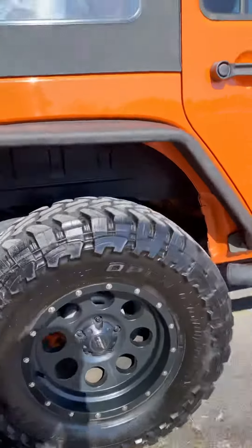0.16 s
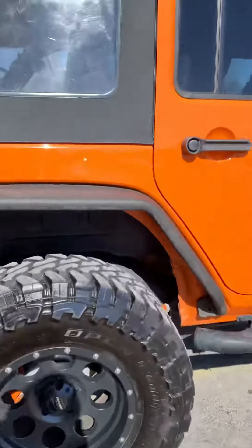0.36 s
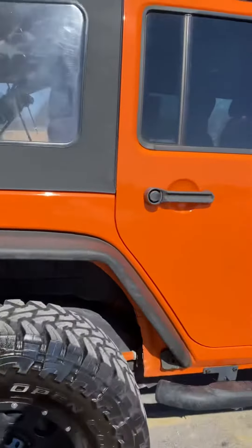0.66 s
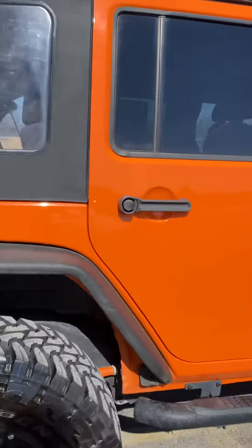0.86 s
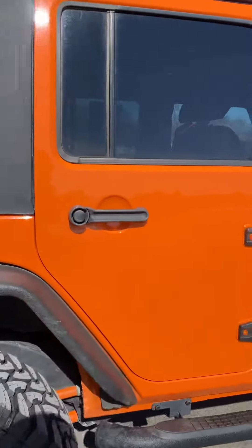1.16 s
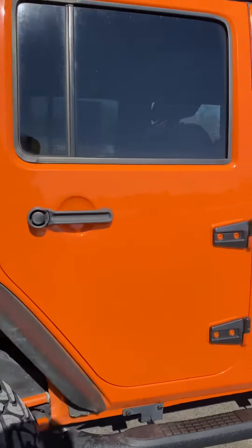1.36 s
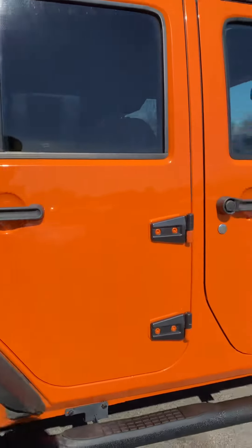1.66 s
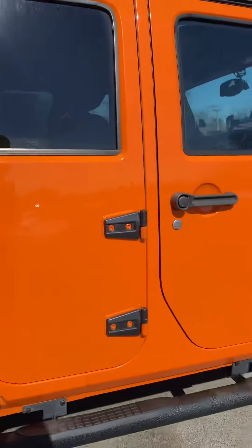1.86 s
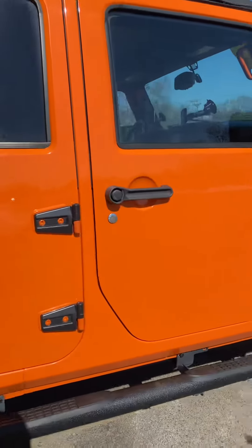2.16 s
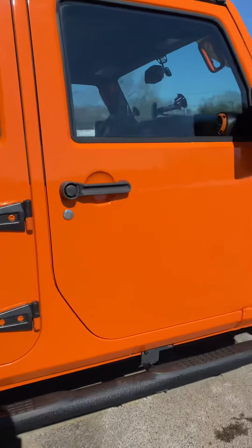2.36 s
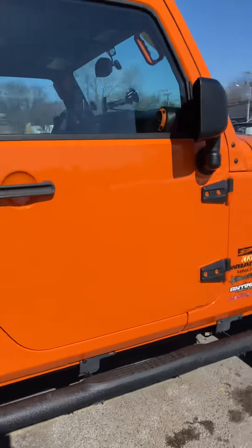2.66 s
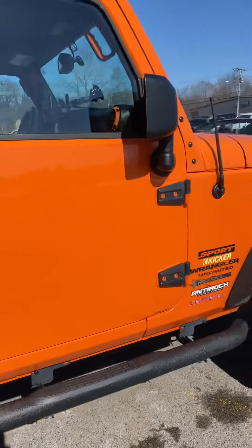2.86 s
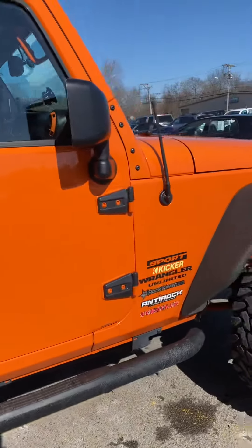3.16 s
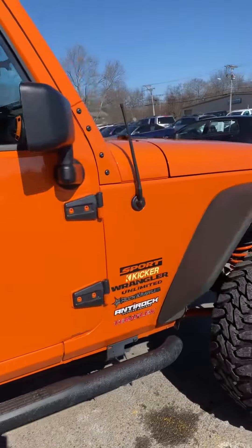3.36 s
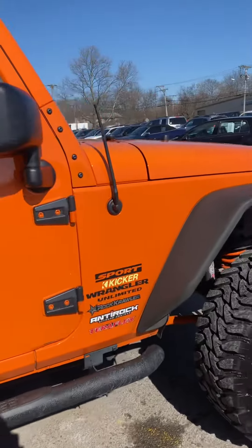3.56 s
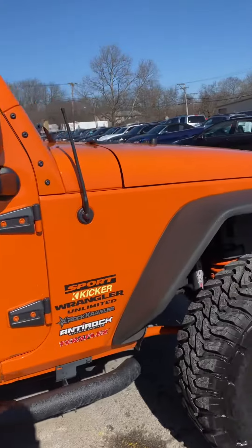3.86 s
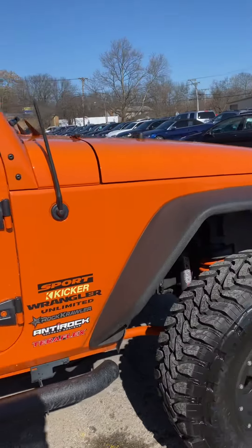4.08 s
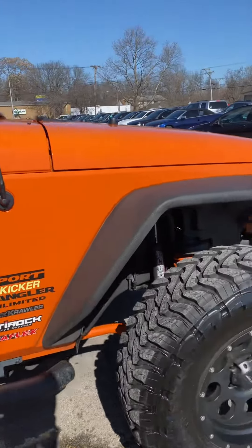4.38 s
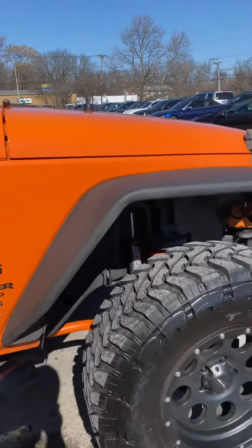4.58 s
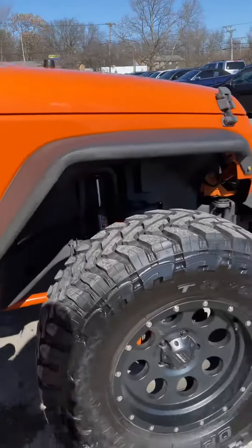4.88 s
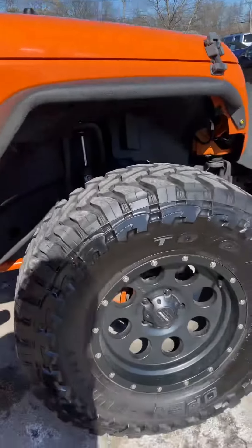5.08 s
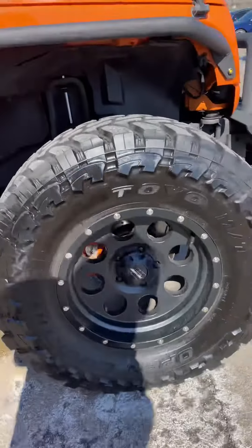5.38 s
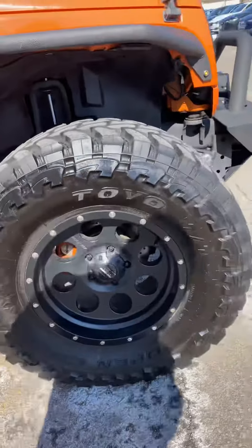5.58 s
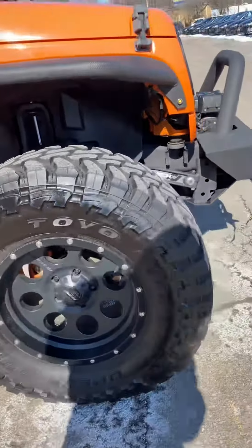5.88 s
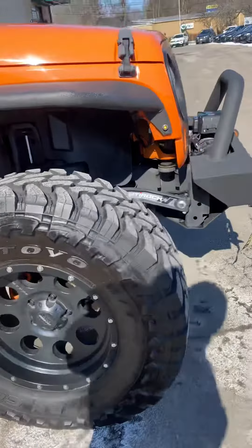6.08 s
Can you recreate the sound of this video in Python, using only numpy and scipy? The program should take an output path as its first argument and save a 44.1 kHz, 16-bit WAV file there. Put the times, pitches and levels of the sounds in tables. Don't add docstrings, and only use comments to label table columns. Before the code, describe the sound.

Close walk along an idling six-cylinder truck: deep humming pulses, growing mechanical hiss and faint belt whine, gusty low thumps, a brief gritty shoe scuff.

```python
import sys
import numpy as np
from scipy import signal
from scipy.fft import rfft, irfft, next_fast_len
from scipy.io import wavfile
from scipy.ndimage import uniform_filter1d

SR = 44100
rng = np.random.default_rng(int(sys.argv[2]) if len(sys.argv) > 2 else 0)


def generate_wav(signal):
    frames = np.transpose(np.atleast_2d(signal))
    scaled = np.clip(frames, -1, 1) * 32767
    pcm = np.round(scaled).astype(np.int16)
    wavfile.write(sys.argv[1], SR, pcm)


def voltage_ratio(level):
    return 10 ** (np.asarray(level, float) / 20)


N = 274919
FAST = next_fast_len(N)
HZ = np.maximum(np.fft.rfftfreq(FAST, 1 / SR), 1)

# time_s, nearness_db
BAY_NEARNESS = [(0, -0.5), (.4, -1.55), (1.4, -0.52), (2.3, -0.67), (3, .5), (3.5, 0.24), (3.8, 0.4),
                (4.3, 0.5), (5.2, 0.62), (5.9, 0.07), (6.23, 0.6)]


def rms_one(x):
    return x / np.sqrt(np.mean(x ** 2) + 1e-20)


def in_time(rows):
    s, *columns = np.transpose(rows)
    return [np.interp(np.arange(N) / SR, s, c) for c in columns]


def at_hz(points, axis=1):
    table = np.array(points)
    return np.interp(np.log(HZ), np.log(table[:, 0]), table[:, axis])


def drift(rate):
    r = np.exp(-80 * np.pi * rate / SR)
    slow = signal.lfilter([1], [1, -2 * r, r * r], rng.standard_normal(N // 40 + 2002))[2000:]
    return np.interp(np.arange(N) / 40, np.arange(len(slow)), rms_one(slow))


def resonate(x, hz, width_hz):
    r = np.exp(-np.pi * width_hz / SR)
    poles = [1, -2 * r * np.cos(2 * np.pi * hz / SR), r * r]
    return signal.lfilter([(1 - r * r) / 2, 0, (r * r - 1) / 2], poles, x)


def coloured(x, spectrum):
    return irfft(rfft(x, FAST) * voltage_ratio(at_hz(spectrum)), FAST)[..., :N]


def low_pass(x, hz):
    return signal.sosfilt(signal.butter(4, hz, fs=SR, output="sos"), x)


def swells(rows, fall_db_per_s, calm_db):
    t, power = np.arange(0, N + 64, 64) / SR, voltage_ratio(2 * calm_db)
    for s, length, db in rows:
        outside_s = np.maximum(np.maximum(s - t, t - s - length), 0)
        power = power + voltage_ratio(2 * (db - fall_db_per_s * outside_s))
    return np.interp(np.arange(N) / SR, t, 10 * np.log10(power))


def engine_turns():
    # time_s, bank_rate_hz (half the firing rate)
    idle_speed = [(0, 16.95), (.54, 16.95), (.74, 17.68), (1.03, 17.88), (1.35, 17.38), (2, 16.98),
                  (2.4, 16.96), (2.75, 17.11), (3.45, 16.88), (3.87, 17.15), (4.2, 17.1), (4.6, 16.85),
                  (5, 16.87), (5.3, 17.03), (6.23, 16.94)]
    return np.cumsum(in_time(idle_speed)[0]) / SR + .27


def spots(multiple):
    # multiple, time_s, peak_db, fall_db_per_s (either side)
    loud_spots = [(5, 0, -41, 9), (5, .8, -43.5, 10), (5, 1.4, -41.5, 12), (5, 2.5, -44, 3), (5, 4, -47, 6),
                  (5, 4.8, -44, 16), (7, .25, -36.5, 12), (7, .8, -39, 12), (7, 2.9, -46, 6),
                  (7, 3.6, -44, 9), (7, 4.1, -44, 12), (7, 4.9, -45, 12), (7, 5.5, -46, 10),
                  (7, 6.1, -49, 4), (8, .35, -42, 20), (8, 3.3, -57, 12), (8, 4, -50, 10),
                  (8, 4.5, -48.5, 12), (8, 4.9, -46.5, 14), (8, 5.55, -44, 12), (8, 5.9, -44, 14),
                  (9, .15, -53, 14), (9, .95, -47, 11), (9, 2.8, -52, 4), (9, 4.9, -53, 10),
                  (9, 6.2, -48, 10), (10, .3, -55, 15), (10, 1, -50.5, 12), (10, 2.3, -53.5, 10),
                  (10, 3.8, -54, 12), (10, 4.9, -53, 16), (10, 5.6, -53, 8), (11, .4, -47.5, 8),
                  (11, .9, -47, 11), (11, 2.5, -53, 3), (11, 4, -53, 3), (11, 5.9, -52.5, 8),
                  (12, .3, -44, 16), (12, 1.5, -55, 10), (12, 2.35, -55, 7), (12, 3.6, -51, 12),
                  (12, 4.1, -46.5, 11), (12, 6, -55, 7), (13, .4, -49.5, 22), (13, 6.1, -54.5, 10),
                  (14, .3, -53, 12), (14, 2, -56, 5), (14, 3.8, -55, 7), (14, 4.5, -55, 12),
                  (14, 5.9, -55, 10)]
    t = np.arange(N) / SR
    levels = [db - fall * np.abs(t - s) for k, s, db, fall in loud_spots if round(k) == multiple]
    return np.max(levels + [-64 + 0 * t], axis=0)


def exhaust(turns, rough_db, wobble_db):
    # time_s, multiple_4_db (of the bank rate), multiple_6_db (re multiple 4)
    along_walk = [(0, -34, 3.5), (.3, -33, 1), (.52, -35.5, 0), (.72, -30, -1), (.9, -29, -2),
                  (1.1, -31, -1), (1.3, -32, -4), (1.5, -38, -.5), (1.7, -35.5, -3.5), (1.95, -37, -3),
                  (2.3, -35.5, -3.5), (3.1, -35.5, -3), (3.5, -38, -1), (3.75, -35, -4.5), (4.1, -35, -4.5),
                  (4.3, -39, -4), (4.5, -33.5, -8.5), (4.7, -40, -7), (4.95, -34.5, -6), (5.4, -37, -7),
                  (5.9, -36.5, -3.5), (6.23, -39, -2.5)]
    # multiple, level_db (re the mean of multiples 4 and 6)
    weaker_orders = [(2, -21), (3, -23)]
    # multiple, lead_rad, change_rad_per_s
    muffler_leads = [(2, 0, 0), (3, 0, 0), (4, -1.55, -.03), (5, -.45, 0), (6, 1, -.3), (7, 3.2, -.25),
                     (8, 1.3, .2), (12, 4, -.9)]
    # pitch_hz, width_hz, level_db
    pipe_rings = [(73.5, 44, 0), (103.7, 15, 4), (208, 81, -11.5), (396, 19, -8), (596, 23, -9.5)]
    cylinder_db = [-8, 8, -2, -19, -9, -10]

    t = np.arange(N) / SR
    db4, sixth_db = in_time(along_walk)
    db6 = db4 + sixth_db
    main_db = (db4 + db6) / 2
    levels = [(4, db4), (6, db6)]
    levels += [(k, spots(multiple=k)) for k in [5, *range(7, 15)]]
    levels += [(k, main_db + db) for k, db in weaker_orders]
    leads = {k: lead + change * t for k, lead, change in muffler_leads}
    nearer_turns = .37 + .465 * t / 343 * 17

    out, burn_db = 0, .4 * drift(4.0)
    for k, db in levels:
        lead = leads.get(k, 2 * np.pi * k * nearer_turns) + .1 * drift(.6)
        level = voltage_ratio(db + burn_db + wobble_db * np.sqrt(k) * drift(2.6))
        out = out + np.sqrt(2) * level * np.cos(2 * np.pi * k * turns + lead)

    at = np.flatnonzero(np.diff(np.floor(2 * turns)))
    pulses = np.zeros(N)
    pulses[at] = voltage_ratio(np.resize(cylinder_db, len(at))) * rng.normal(0.6, 1, len(at))
    rings = 0
    for k, (hz, width_hz, db) in enumerate(pipe_rings):
        rings = rings + (-1) ** k * voltage_ratio(db) * rms_one(resonate(pulses, hz, width_hz))
    return out + voltage_ratio(main_db + rough_db) * low_pass(rings, 580)


def thumps():
    # time_s, peak_db, pitch_hz, sign (push +1, pull -1)
    eddies = [(.0, -20, 110, -1), (.018, -28, 110, -1), (.040, -27, 80, -1), (.0935, -26, 90, 1),
              (.4175, -30, 94, -1), (1.094, -30, 96, -1), (1.1555, -28, 73, -1), (1.3005, -27, 67, -1),
              (1.346, -30, 70, -1), (1.387, -29, 75, -1), (1.441, -26, 84, -1), (1.533, -27, 76, -1),
              (1.6218, -23, 86, -1), (1.9465, -29, 66, -1), (2.3008, -33, 93, -1), (3.181, -30, 79, -1),
              (3.712, -28, 80, -1), (3.8225, -30, 73, -1), (3.8813, -30, 87, 1), (4.217, -33, 66, 1),
              (4.484, -28, 76, 1), (4.5395, -27, 63, 1), (4.68, -31, 72, 1), (4.9185, -33, 70, -1),
              (5.0765, -29, 75, 1), (5.138, -31, 81, -1)]
    t = np.arange(N) / SR
    out = np.zeros(N)
    for s, db, hz, sign in eddies:
        near = slice(max(int((s - .05) * SR), 0), int((s + .05) * SR))
        cycles = hz * (t[near] - s)
        out[near] += sign * voltage_ratio(db) * np.exp(-(cycles / .9) ** 2) * np.cos(2 * np.pi * cycles)
    return out


def engine_bay(turns):
    # pitch_hz, level_db_per_hz
    bay_colour = [(35, -1.5), (100, 1.5), (160, 3.5), (250, -0.5), (500, -3.5), (1100, -8), (1350, -7),
                  (1700, -8), (2500, -9), (3300, -8), (4200, -15), (5300, -18), (6500, -18), (9500, -18.5),
                  (11500, -20), (15500, -28)]
    edges_hz = [0, 900, 2200, 4400, 9000, 20000]
    bay_follows = [1, 0.98, 1.2, 0.83, 0.99]
    swell_db = [.2, .5, .9, 1.0, 1.4]

    near_db = in_time(BAY_NEARNESS)[0]
    beat = .8 * np.cos(4 * np.pi * turns)
    beat = beat + .7 * np.cos(2 * np.pi * turns)
    beat = beat + .4 * np.cos(2 * np.pi * turns / 3)
    beat = beat + .4 * np.cos(8 * np.pi * turns)
    spread = rfft(rms_one(coloured(rng.standard_normal((2, N)), bay_colour)), FAST)
    out = 0
    for k, share in enumerate(bay_follows):
        inside = (HZ >= edges_hz[k]) * (HZ < edges_hz[k + 1])
        band = irfft(spread * inside, FAST)[:, :N]
        out = out + band * voltage_ratio(share * near_db + swell_db[k] * beat + .6 * drift(9.0))
    return voltage_ratio(-40.0) * out


def ticks(turns):
    taps_per_s, ring_cycles, low_hz, high_hz = 400, 18.0, 950, 5200
    bunch = 1 + .6 * np.cos(4 * np.pi * turns)
    struck = rng.random(N) < taps_per_s * bunch / SR
    force = voltage_ratio(3.6 * np.minimum(rng.exponential(1, N), 4))
    taps = struck * force * rng.choice([-1, 1], N)
    dealt = rng.integers(0, 16, N)
    parts_hz = np.geomspace(low_hz, high_hz, 16) * rng.uniform(.95, 1.05, 16)
    rings = []
    for k, hz in enumerate(parts_hz):
        ring = resonate(taps * (dealt == k) + 1e-18, hz, 2.6 * hz / ring_cycles)
        rings.append(ring / np.sqrt(hz))
    pair = np.array([sum(rings), sum(rings[::2]) - sum(rings[1::2])])
    return voltage_ratio(-53 + 1.1 * in_time(BAY_NEARNESS)[0]) * rms_one(pair)


def whines():
    # start_s, end_s, pitch_hz, width_hz, level_db
    whining_parts = [(-0.64, 1.35, 376, 8, -50.5), (-.3, .4, 420, 40, -55), (3.2, 4.1, 378, 8, -55),
                     (3.45, 4.3, 580, 18, -51.5), (3.55, 4.1, 660, 40, -56), (4.4, 5.2, 570, 30, -57),
                     (.2, 1, 1185, 14, -61), (2.3, 4.2, 1185, 16, -58), (4, 5.1, 1120, 30, -57),
                     (5.35, 6.4, 1105, 30, -55), (2.2, 4.1, 1360, 90, -55), (4.65, 5, 1270, 30, -55),
                     (5.1, 5.5, 1350, 40, -54), (3.3, 4.9, 1610, 50, -57), (3.5, 4.4, 1830, 60, -57),
                     (4.6, 5.35, 1815, 25, -51), (4.85, 5.45, 1870, 60, -50.5), (5.1, 5.65, 1930, 40, -52),
                     (4.2, 5.4, 2705, 20, -54), (4.9, 5.7, 2550, 150, -54), (4.85, 6.5, 2650, 300, -54.5),
                     (5.5, 6.5, 2400, 40, -54), (2, 4.3, 2030, 250, -55), (2.2, 4.1, 2520, 120, -58),
                     (5.3, 5.5, 2550, 120, -53), (5.4, 6, 390, 50, -54)]
    out, white = np.zeros((2, N)), rng.standard_normal((2, N))
    for start, end, hz, width_hz, db in whining_parts:
        heard = slice(max(int(start * SR), 0), min(int(end * SR), N))
        t = np.arange(N)[heard] / SR
        fade = np.clip(np.minimum(t - start, end - t) / .2, 0, 1)
        steady = .65 * (width_hz < 31)
        wander = np.cumsum(white[:, heard], axis=1) * np.sqrt(width_hz / SR)
        tone = np.sqrt(2 * steady) * np.sin(2 * np.pi * hz * t + wander)
        rough = rms_one(resonate(resonate(white[:, heard], hz, width_hz), hz, width_hz))
        out[:, heard] += voltage_ratio(db) * fade * (tone + np.sqrt(1 - steady) * rough)
    return out


def wind():
    # start_s, length_s, level_db
    head_gusts = [(0, 0.12, -38.5), (.26, 0.19, -42), (.7, .1, -46), (1.08, 0.13, -38.5), (1.28, .33, -37),
                  (1.86, 0.092, -44), (2.25, 0.28, -43), (2.93, 0.072, -45), (3.14, 0.059, -45),
                  (3.58, 0.34, -45), (4.1, 0.13, -46), (4.42, 0.2, -40), (4.6, .4, -44),
                  (5.04, 0.11, -42.5), (5.2, 0.46, -45), (5.9, .15, -51)]
    # start_s, length_s, level_db, flutter_db (re rumble)
    side_gusts = [(0.07, 0.14, -29, -16), (0.417, 0.061, -29.5, -17.5), (0.763, 0.05, -42, -11),
                  (1.088, 0.22, -34.5, -11.5), (1.41, 0.12, -34, -17), (1.942, 0.05, -31, -16),
                  (2.2, 0.13, -33.5, -15.5), (2.86, 0.061, -32, -14.5), (3.08, 0.2, -35.5, -20),
                  (3.486, 0, -31, -29), (4.073, 0.037, -41.5, -21), (4.41, 0.27, -33.5, -15.5),
                  (4.73, 0, -29.5, -21.5), (4.958, 0.35, -32.5, -15), (5.27, 0.19, -31.5, -20.5)]
    # pitch_hz, level_db_per_hz
    common_colour = [(20, -25), (35, -4), (52, 3), (75, 1), (100, -1.5), (150, -17.5), (300, -24.5),
                     (800, -94.5)]
    apart_colour = [(20, -25), (35, -11.5), (55, -3.5), (90, 1.5), (140, -5), (210, -10.5), (260, -30.5),
                    (800, -100)]
    flutter_colour = [(100, -36), (220, 5), (450, -17), (700, -14), (1500, -71)]

    common_db = swells(head_gusts, fall_db_per_s=169, calm_db=-63)
    rumble_rows = [(s, length, db) for s, length, db, _ in side_gusts]
    apart_db = swells(rumble_rows, fall_db_per_s=69, calm_db=-58.5)
    flutter_rows = [(s, length, db + re_db) for s, length, db, re_db in side_gusts]
    flutter_db = swells(flutter_rows, fall_db_per_s=80.5, calm_db=-64)

    common = voltage_ratio(common_db + 4.5 + 1.3 * drift(12.0))
    common = common * rms_one(coloured(rng.standard_normal(N), common_colour))
    lumps_db = 1.9 * drift(22.0)
    apart = voltage_ratio(apart_db - 3.5 + lumps_db) * rms_one(coloured(rng.standard_normal(N), apart_colour))
    gust_db = flutter_db - 3 * np.clip(-47.5 - flutter_db, 0, 9)
    flutter = rms_one(coloured(rng.standard_normal(N), flutter_colour))
    apart += voltage_ratio(gust_db + 1.0 + 2.1 * lumps_db) * flutter
    return np.array([common + apart, common - apart])


def scuffs():
    # start_s, peak_db, centre_hz, t60_s, width_share (of centre)
    grit_bursts = [(.7165, -32, 3000, .06, .8), (.7165, -37, 4300, .04, .3), (.7165, -27, 2000, .05, .2),
                   (.717, -29, 650, .07, .3), (.7215, -32, 2900, .04, .4), (.7245, -33, 2300, .04, .6),
                   (.748, -33, 600, .06, .4), (.748, -38, 2500, .06, 1.2), (.759, -31, 1000, .025, .4),
                   (.7718, -27, 1500, .02, .8), (.7755, -31, 2150, .05, .15), (.768, -32, 750, .05, .3)]
    out, t = np.zeros((2, N)), np.arange(6000) / SR
    for s, db, hz, t60, share in grit_bursts:
        grit = rng.standard_normal((2, len(t))) * voltage_ratio(-60 * t / t60) * np.minimum(t / .002, 1)
        burst = resonate(grit, hz, share * hz)
        i = round(s * SR)
        out[:, i:i + len(t)] += voltage_ratio(db) * burst / np.abs(burst).max()
    return out


def knocks():
    # start_s, peak_db, pitch_hz, t60_s
    hollow_blows = [(5.3297, -22, 450, 0.029), (5.3319, -26, 290, 0.05), (5.33, -35, 620, 0.013),
                    (5.9628, -33.5, 920, 0.033), (5.9685, -23, 286, 0.025), (5.9796, -27.5, 300, 0.036),
                    (5.9829, -31, 274, 0.026), (6.021, -34, 332, .08), (5.9832, -28, 490, 0.04),
                    (6.208, -32, 820, 0.016), (6.210, -24, 453, 0.015)]
    out, t = np.zeros(N + 4000), np.arange(4000) / SR
    for s, db, hz, t60 in hollow_blows:
        i = round(s * SR)
        ring = voltage_ratio(db - 60 * t / t60) * np.minimum(t / .001, 1) * np.sin(2 * np.pi * hz * t)
        out[i:i + len(t)] -= ring
    return out[:N]


def ground(x):
    delay_s, sway_s, echo_db = .0075, .0009, -9.5
    late = np.arange(N) - SR * (delay_s + sway_s * drift(.5))
    echoed = np.array([v + voltage_ratio(echo_db) * np.interp(late, np.arange(N), v) for v in x])
    return echoed / np.sqrt(1 + voltage_ratio(2 * echo_db))


def two_ports(a, b):
    # pitch_hz, left_lead_rad, likeness (0-1)
    port_phase = [(150, 0, .995), (700, .7, .72), (1380, .4, .88), (2000, 1.9, .5), (2600, 2.55, .78),
                  (3300, 3.14, .92), (3750, 3.55, .8), (4150, 1.3, .25), (4900, 3.1, .84), (5550, 1.5, .72),
                  (7600, 2.5, .75), (8700, 3.1, .97), (11500, 3.1, .95), (13200, 3.7, .6),
                  (15300, 6.1, .75)]
    # pitch_hz, left_minus_right_db
    port_tilt = [(500, 0), (750, 1.5), (1200, 4.5), (1700, 2), (2300, -.5), (4000, -1.5), (5500, 0)]
    # time_s, scattered_share (0-1), extra_left_lead_rad
    well_scatter = [(0, 0, .5), (.13, 0, .35), (.38, 0, 0), (.6, 0, -.3), (.82, .05, 0), (1.2, .2, -.2),
                    (1.7, .12, .05), (2.3, .15, -.2), (2.75, .1, 0), (3.2, .3, -.4), (3.9, .12, -.6),
                    (4.6, .4, -.5), (5, .6, -.6), (6.23, .55, -.6)]

    alike, tilt = at_hz(port_phase, axis=2), voltage_ratio(at_hz(port_tilt) / 2)
    left, other = rfft(a, FAST), rfft(b, FAST)
    shared = alike * np.exp(-1j * at_hz(port_phase)) * left
    own = np.sqrt(1 - alike ** 2) * other
    well = (HZ > 2000) * (HZ < 5400)
    spectra = [
        left * tilt,
        (shared * (1 - well) + own) / tilt,
        shared * well,
        -1j * shared * well * (HZ < 4000),
        alike * well * 1j * other,
    ]
    left, right, aimed, turned, scattered = irfft(spectra, FAST)[:, :N]
    share, lead = in_time(well_scatter)
    direct = np.sqrt(1 - share) * (np.cos(lead) * aimed + np.sin(lead) * turned)
    return np.array([left, right + direct + np.sqrt(share * .85) * scattered])


def scene():
    turns = engine_turns()
    centre = low_pass(knocks(), 2500) + thumps() + exhaust(turns, rough_db=-20.0, wobble_db=.15)
    bay, near, air = engine_bay(turns), whines() + low_pass(scuffs(), 7600), wind()
    placed = two_ports(*(ground(bay + ticks(turns)) + near))
    return centre * voltage_ratio([[-.1], [.1]]) + placed + air


def dip_under_flutter(x):
    band = signal.butter(2, [140, 420], "band", fs=SR, output="sos")
    both, apart = signal.sosfiltfilt(band, [x[0] + x[1], x[0] - x[1]])
    both_power = uniform_filter1d(both ** 2 + 1e-12, size=8192)
    excess = uniform_filter1d(apart ** 2, size=2048) / both_power / voltage_ratio(2 * 4.2)
    return x - both / 2 * excess ** 2 / (1 + excess ** 2)


def thin_weak_bands(x, unsteady_db):
    # pitch_hz, level_db
    keep_over = [(1500, -30), (2500, -15), (3400, -13), (4900, -11), (6000, -12), (7600, -9), (9000, -9),
                 (12800, -8), (14000, -7.5), (15400, -1.5)]
    frame = dict(nperseg=2048, noverlap=1024, window="cosine")
    hz, _, z = signal.stft([x[0] + x[1], x[0] - x[1]], SR, **frame)
    power = np.abs(z[:, :1024]).reshape(2, 64, 16, -1) ** 2
    power, centres = power.mean(axis=2), hz[8:1024:16]
    waver = rng.standard_normal(power.shape) + rng.standard_normal(power.shape[2])
    bar_db = np.interp(centres, *np.transpose(keep_over))[:, None] + unsteady_db * waver
    bar = power.sum(axis=0).mean(axis=1)[:, None] * voltage_ratio(2 * bar_db)
    z[:, :1024] *= np.repeat(power > bar, 16, axis=1)
    z[:, :1024] *= np.abs(z[:, :1024]) ** 2 > .8 * np.repeat(bar, 16, axis=1)
    both, apart = signal.istft(z, SR, **frame)[1][:, :N] / 2
    return np.array([both + apart, both - apart])


def top_cut(x):
    return signal.sosfilt(signal.butter(12, 15750, fs=SR, output="sos"), x)


def record(dry):
    x = signal.sosfilt(signal.butter(3, 30.0, "high", fs=SR, output="sos"), dry)
    mix = thin_weak_bands(dip_under_flutter(x), unsteady_db=2.2)
    return top_cut(mix)


dry = scene()
out = record(dry)
generate_wav(out)
```